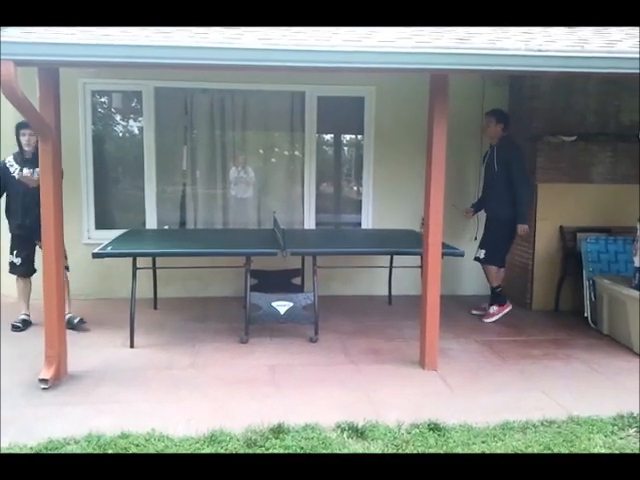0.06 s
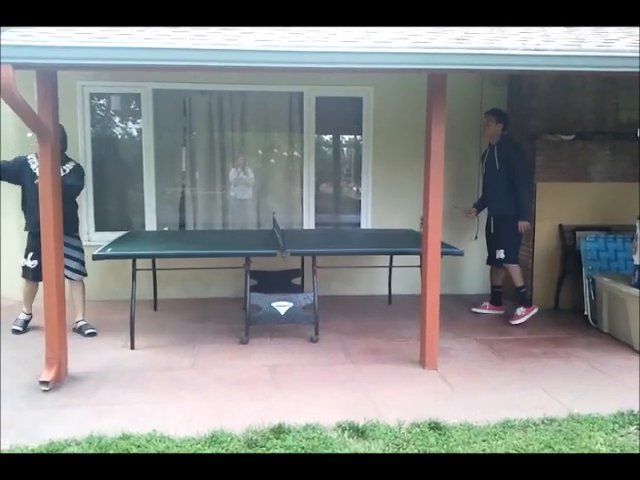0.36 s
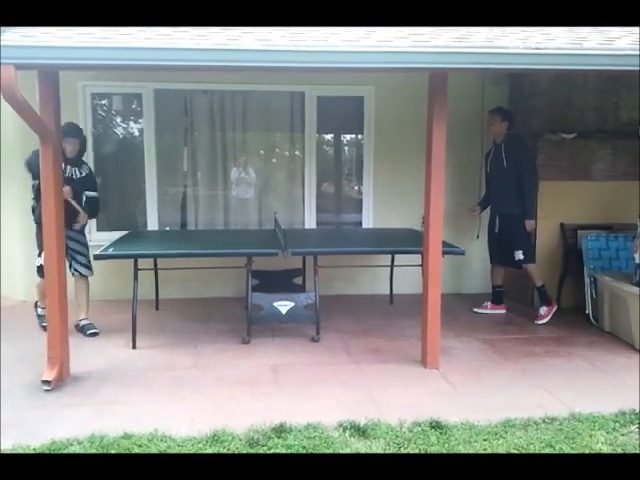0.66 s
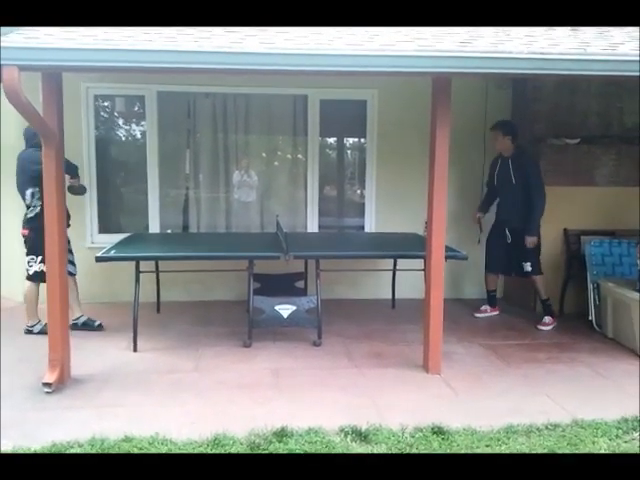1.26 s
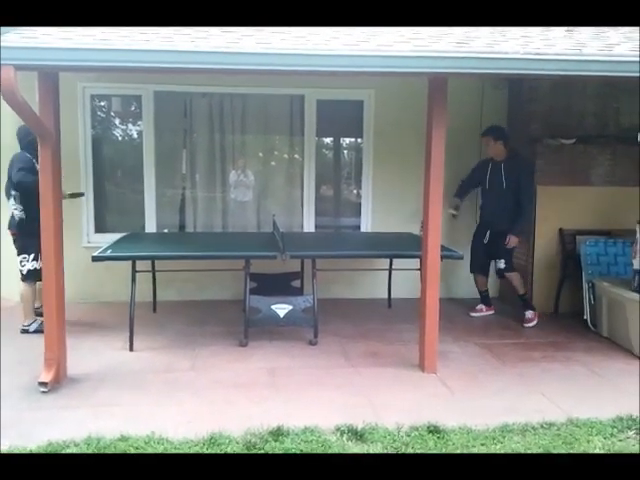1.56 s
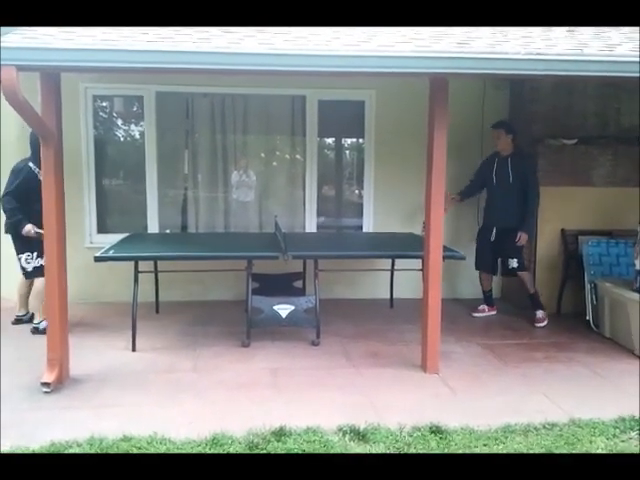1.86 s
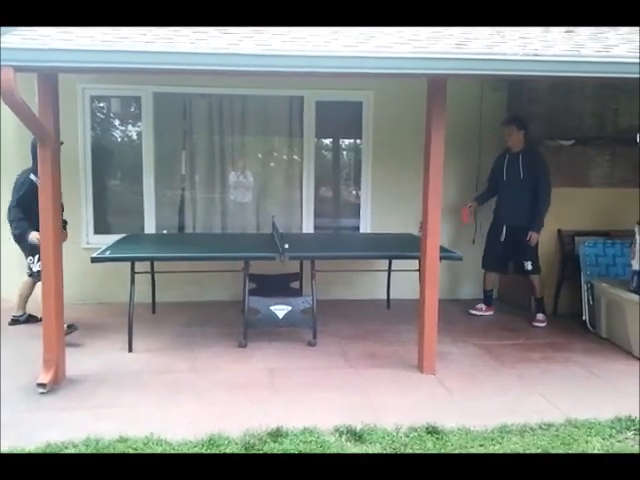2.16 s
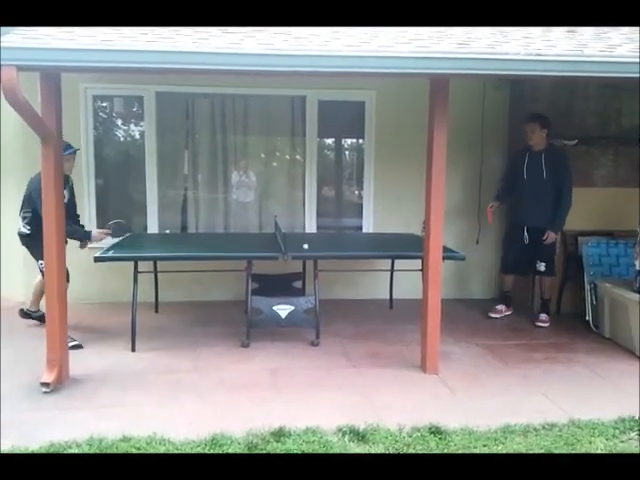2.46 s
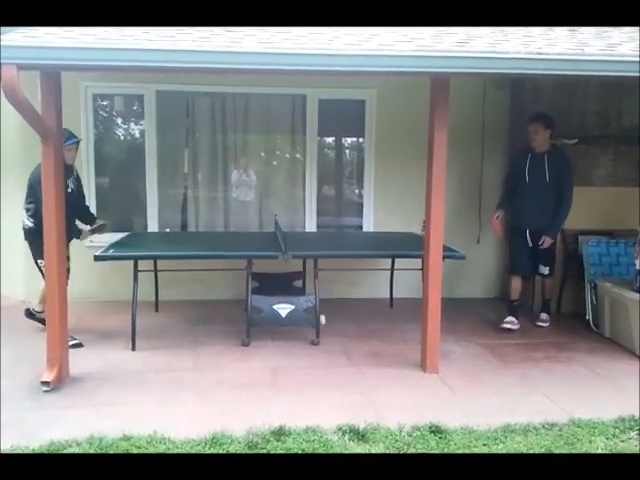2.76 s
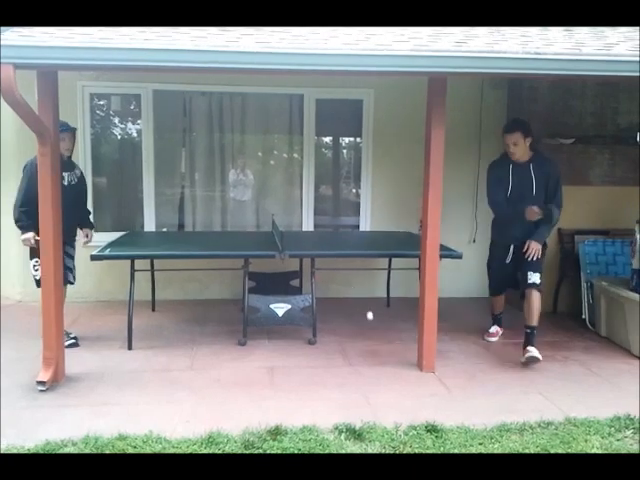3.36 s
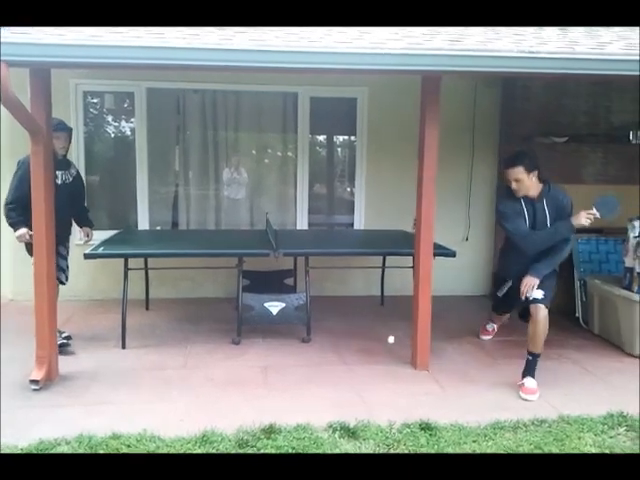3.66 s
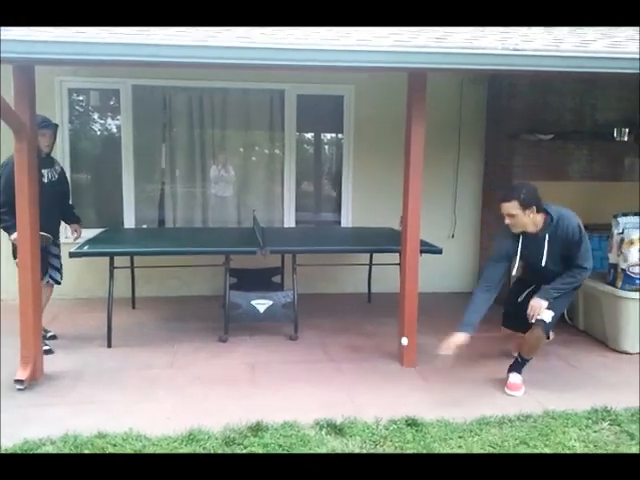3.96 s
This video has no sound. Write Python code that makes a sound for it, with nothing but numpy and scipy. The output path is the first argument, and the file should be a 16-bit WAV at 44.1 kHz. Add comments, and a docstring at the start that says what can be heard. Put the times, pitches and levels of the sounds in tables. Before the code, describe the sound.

A ping-pong ball clicks off paddles and a table in a short rally, then bounces twice on concrete, each hit echoing under a patio roof. Wind thumps the microphone over a quiet outdoor hush and faint shoe scuffs.

```python
"""Gusts buffet the microphone on a lawn, over a quiet outdoor hush and the scuff of shoes.
Across the grass, under a patio roof, a short table-tennis rally starts: the ball cracks on paddles
and table and sets the boards ringing, then drops and pings twice on the concrete with its hollow shell.
Wall, floor and roof throw every hit back. The recorder is narrow-band and rounds the biggest peaks."""
import sys
import numpy as np
from scipy import signal
from scipy.fft import rfft, irfft, next_fast_len
from scipy.io import wavfile
from scipy.ndimage import uniform_filter1d

SR = 44100
rng = np.random.default_rng(int(sys.argv[2]) if len(sys.argv) > 2 else 0)


def pcm_store(signal):
    """Save signal as 16-bit PCM."""
    levels = np.round(np.clip(np.atleast_2d(signal), -1, 1) * 32767)
    wavfile.write(sys.argv[1], SR, levels.astype(np.int16).T)


N = 176400
TOP_HZ, HIT_S = 7350, .7  # upper edge of the sound; time each hit is given to ring out


def undb(db):
    """Decibels to gain."""
    return 10 ** (np.asarray(db) / 20)


def unit(x):
    """Scale to an energy of one."""
    return x / np.sqrt(np.sum(x ** 2) + 1e-18)


def shape(x, gain):
    """Filter by a gain given as a function of frequency."""
    return irfft(rfft(x) * gain(np.maximum(np.fft.rfftfreq(len(x), 1 / SR), 1)), len(x))


def noise(points):
    """Noise of rms one, coloured by (Hz, dB) points."""
    hz, db = np.array(points).T
    x = shape(rng.standard_normal(N), lambda f: undb(np.interp(np.log(f), np.log(hz), db)))
    return x / x.std()


def walk(rate_hz):
    """A smooth random wander with a spread near one."""
    step = int(SR / rate_hz)
    return uniform_filter1d(np.repeat(rng.standard_normal(N // step + 1), step), step)[:N]


def swell(at, half_s):
    """A bell-shaped rise and fall centred on a time in seconds."""
    return np.exp(-.5 * ((np.arange(N) / SR - at) / half_s) ** 2)


def add(out, x, at):
    """Mix a sound in at a time in seconds."""
    i = int(at * SR)
    out[i:i + len(x)] += x[:max(N - i, 0)]


def hit_time():
    """Time axis of one hit, in seconds."""
    return np.arange(next_fast_len(int(HIT_S * SR))) / SR


def decay(t, t60):
    """A fall of 60 dB every t60 seconds."""
    return np.exp(-np.log(1000) * t / t60)


def hush():
    """Traffic and leaves, steady and far from the microphone."""
    # The distant air. Each row: frequency in Hz, relative level in dB.
    spectrum = [(60, -12), (140, -0.5), (280, 0), (400, -0.5), (600, -4.5), (800, -4), (1050, -3),
                (1500, -9), (2100, -9.5), (2600, -14), (4000, -15), (6600, -16.5), (7400, -31)]
    return undb(-41.5) * noise(spectrum)


def wind():
    """Eddies thump the microphone itself over the weak rumble of a breeze."""
    # Gusts. Each row: centre in seconds, half-length in seconds, level in dB, upper edge in Hz.
    gusts = [(0.074, 0.055, -27, 45), (0.173, 0.016, -22.5, 60), (0.226, 0.018, -13.5, 76),
             (0.292, 0.0039, -12.5, 153), (0.309, 0.027, -14.5, 86), (0.597, 0.041, -23, 42),
             (0.821, .035, -32, 83.5), (1.332, .012, -27, 69.4), (2.2, 0.027, -28, 90),
             (2.46, 0.089, -27.5, 80), (2.558, 0.025, -14, 76.3), (2.645, 0.0087, -10, 96),
             (2.878, 0.061, -26.5, 90), (3.045, 0.039, -23.5, 64), (3.278, 0.11, -28.5, 70),
             (3.563, 0.029, -21, 55.6), (3.622, 0.012, -6, 115), (3.641, 0.019, -12.5, 149),
             (3.723, 0.017, -7, 137), (3.747, .014, -13, 85), (3.832, 0.018, -20.5, 67.5)]
    breeze_hz_db = [(10, -3.5), (25, 2.5), (50, -1), (100, -11.5), (200, -21.5), (500, -61)]
    out = undb(-34.5 + 2 * walk(rate_hz=6.05)) * noise(breeze_hz_db)
    for at, half_s, db, edge_hz in gusts:
        band = lambda f: 1 / np.hypot(1, (f / edge_hz) ** 3.86) / np.hypot(1, (.46 * edge_hz / f) ** 2)
        eddies = shape(rng.standard_normal(N), band)
        envelope = swell(at, half_s)
        out += undb(db) * unit(eddies * envelope) * np.linalg.norm(envelope)
    return out


def shoe_scuffs():
    """Soles drag over the patio's gritty concrete, faint from the lawn."""
    # Scuffs. Each row: centre in seconds, half-length in seconds, level in dB.
    scuffs = [(0.103, 0.054, -43), (0.266, .014, -40), (0.932, .016, -45), (1.842, 0.024, -44),
              (3.215, .032, -34.5), (3.708, 0.0097, -46), (3.917, 0.011, -42.5), (3.976, 0.021, -34.5)]
    # Grit under a sole. Each row: frequency in Hz, relative level in dB.
    grit = [(100, -25), (650, -7), (950, 6), (1400, -3), (2500, 1.5), (4200, -6.5), (6000, -2),
            (7500, -14.5)]
    drag = sum(undb(db) * swell(at, half_s) for at, half_s, db in scuffs)
    return drag * noise(grit) * undb(2 * walk(rate_hz=250))


def patio(x, build_s=.0047):
    """Dense reflections under the roof and a weak longer tail, different for every spot."""
    # The patio's ring. Each row: band centre in Hz, early and late t60 in seconds, late level in dB.
    bands = [(250, .3, 0.96, -4), (1000, 0.22, 0.9, -13), (2500, 0.17, 1, -19), (6000, 0.12, .45, -4.5)]
    t = hit_time()
    scatter = rng.standard_normal(len(t))
    centres = np.log([row[0] for row in bands])
    tail = 0
    for share, (_, early_s, late_s, late_db) in zip(np.eye(len(bands)), bands):
        band = shape(scatter, lambda f: np.interp(np.log(f), centres, share))
        tail += band * (decay(t, early_s) + undb(late_db) * decay(t, late_s))
    return signal.fftconvolve(x, unit(tail * (1 - np.exp(-t / build_s))))[:len(t)]


def click(points, lag_s=.000419, smear_s=.0012):
    """The crack of contact: an impulse coloured by (Hz, dB) points, its treble trailing slightly."""
    t = hit_time()
    f = np.fft.rfftfreq(len(t), 1 / SR)
    hz, db = np.array(points).T
    gain = undb(np.interp(np.log(f + 1), np.log(hz), db)) / np.hypot(1, (f / TOP_HZ) ** 10)
    # Minimum phase keeps the attack sharp.
    cepstrum = irfft(np.log(gain), len(t)) * (1 + np.sign(t)) * (t < t[-1] / 2)
    delay_s = lag_s + smear_s * f / TOP_HZ / 2
    return unit(irfft(np.exp(rfft(cepstrum) - 2j * np.pi * f * delay_s), len(t)))


def brief_ring(hz, rise_s):
    """One struck mode swells and dies within milliseconds."""
    t = hit_time()
    return unit(np.sin(2 * np.pi * hz * t) * (t / rise_s) ** 2 * np.exp(-t / rise_s))


def ticks():
    """Sharp ticks with a brief high ring from ball or paddle, most sounding with a stroke or bounce."""
    # Ticks. Each row: start in seconds, level in dB, ring in Hz.
    events = [(0.7872, -8.5, 5200), (1.274, -13.5, 5950), (1.0725, -5, 3410), (1.5625, -6.5, 3220),
              (2.1373, -13, 3860), (2.359, -16.5, 4000), (2.544, -17.5, 3400), (2.556, -13, 3120)]
    out = np.zeros(N)
    for at, db, hz in events:
        ring = undb(-8) * brief_ring(hz, rise_s=.00055)
        crack = undb(-8.5) * click([(hz / 10, -20), (hz * .7, -7), (hz, 0), (hz * 1.25, -6)])
        tick = undb(db) * (ring + crack)
        add(out, tick + undb(2) * patio(tick), at)
    return out


def floor_bounces():
    """On concrete only the hollow shell rings: a click and a very short ping."""
    # Bounces. Each row: start in seconds, then levels in dB of the click, four shell modes and patio.
    bounces = [(3.0452, 6.4, -3, -5.5, 6.5, -5.5, 0), (3.728, 6.7, 4.5, 6.5, -6.5, -14, 0)]
    # The click on concrete. Each row: frequency in Hz, relative level in dB.
    contact = [(100, -44), (650, -8.5), (1100, 4), (1500, 1.5), (2500, 4.5), (3500, -6.5), (4700, -6),
               (5700, -1), (7500, -13)]
    shell_hz = [2510, 3814, 5410, 7030]
    out = np.zeros(N)
    for at, click_db, *shell_db, patio_db in bounces:
        ping = sum(undb(db) * brief_ring(hz, rise_s=.00069) for hz, db in zip(shell_hz, shell_db))
        crack = undb(click_db) * click(contact)
        reflections = patio(crack) + undb(-14) * patio(ping)
        add(out, ping + undb(-8) * crack + undb(patio_db) * reflections, at)
    return out


def knocks(hits, modes, contact, click_db, rise_s=.0014):
    """The ball rings a board; a slap from the nearest surface and the patio's ring follow."""
    out, t = np.zeros(N), hit_time()
    attack = 1 - np.exp(-t / rise_s)
    for at, db, db_per_octave, pitch, slap_s, slap_db, patio_db in hits:
        tilt = lambda f: undb(db + db_per_octave * np.log2(np.clip(f, 700, 5000) / 1200))
        ring = 0
        for hz, mode_db, t60 in modes:
            tone = np.sin(2 * np.pi * (hz * pitch * t + rng.random()))
            ring += undb(mode_db) * unit(tone * decay(t, t60) * attack)
        body = shape(ring, tilt)
        crack = shape(undb(click_db) * click(contact), tilt)
        reflections = undb(-1) * patio(body) + undb(4.5) * patio(crack)
        add(out, body + crack + undb(patio_db) * reflections, at)
        add(out, undb(slap_db) * (body + crack), at + slap_s)
    return out


def table_bounces():
    """The ball lands on the table and the top rings briefly."""
    # Bounces. Each row: start in seconds, level in dB, brightness in dB per octave, pitch factor,
    # slap delay in seconds, slap level in dB, patio level in dB.
    bounces = [(.7865, -6.5, -5.5, 1.127, 0.018, -0.5, 6.5), (1.7385, 1, -1, 1.006, 0.0051, 5, 1),
               (2.3635, -11.5, -3.5, 1.06, 0.006, 7, 2.5)]
    # Modes of the table top. Each row: frequency in Hz, level in dB, t60 in seconds.
    modes = [(876, -1, .022), (924, -11.5, 0.018), (1552, -10.5, 0.033), (1890, -9, 0.032),
             (3680, -12, 0.0091), (5150, -14, .006)]
    # The click on the table. Each row: frequency in Hz, relative level in dB.
    contact = [(100, -18), (250, -5), (550, -12), (900, 8), (2000, 1.5), (4000, -2.5), (7500, -12)]
    return knocks(bounces, modes, contact, click_db=-5)


def paddle_hits():
    """A paddle strikes the ball: a crack and the knock of the blade carry across the lawn."""
    # Strokes. Each row: start in seconds, level in dB, brightness in dB per octave, pitch factor,
    # slap delay in seconds, slap level in dB, patio level in dB.
    strokes = [(1.0718, 0.5, -1.5, 0.98, .0085, -4, 1.5), (1.5602, 6, -1.46, 0.99, .0055, -6.5, -4.5),
               (2.1560, -10, 0, 1.063, .0095, 2.5, 7), (2.555, -14.5, -5.5, .93, .005, 3.5, 2),
               (3.9568, -18, 4, 1.24, .004, 0, 2)]
    # Modes of the paddle. Each row: frequency in Hz, level in dB, t60 in seconds.
    modes = [(215.8, -18, 0.18), (336, -15.5, 0.059), (1016, -2.5, 0.04), (1210, -1.5, 0.011),
             (1360, -8.5, 0.0093), (1858, -5, 0.045), (2060, -1.5, 0.0082), (3150, -9, 0.012),
             (6510, -16.5, 0.015)]
    # The click on the paddle. Each row: frequency in Hz, relative level in dB.
    contact = [(120, -27), (220, -5.5), (450, -3), (590, -10), (950, 3), (2200, -5), (2550, -8.5),
               (3300, -15), (4100, -14), (7000, -27)]
    return knocks(strokes, modes, contact, click_db=.5)


def scene():
    """The rally, the players' feet and the air, at one microphone on the lawn."""
    rally = paddle_hits() + table_bounces() + floor_bounces() + ticks()
    return (rally + shoe_scuffs() + wind() + hush())[None]


def record(dry, offset=-.32, ceiling=.84):
    """A narrow-band recorder whose signal rests off centre, so the biggest downward peaks are rounded."""
    lowpass = signal.ellip(8, .3, 70, TOP_HZ, fs=SR, output="sos")
    shifted = signal.sosfilt(lowpass, dry[0]) + offset
    rounded = shifted / (1 + (shifted / ceiling) ** 20) ** (1 / 20)
    return shape(rounded, lambda f: 1 / np.hypot(1, (f / (1.06 * TOP_HZ)) ** 60))[None]


dry = scene()
out = record(dry)
pcm_store(out)
```